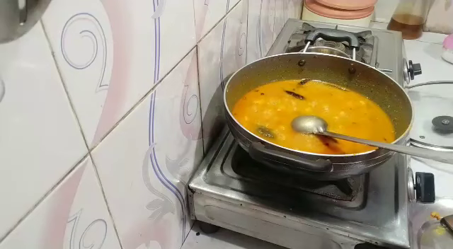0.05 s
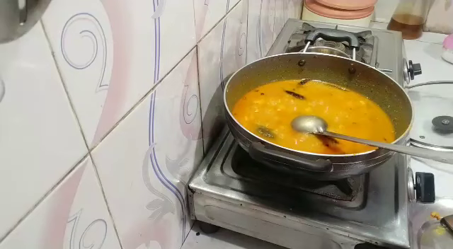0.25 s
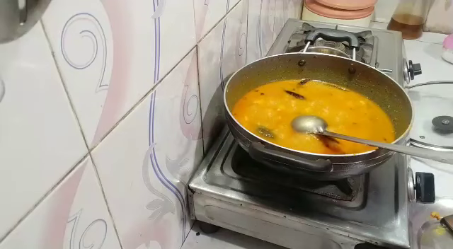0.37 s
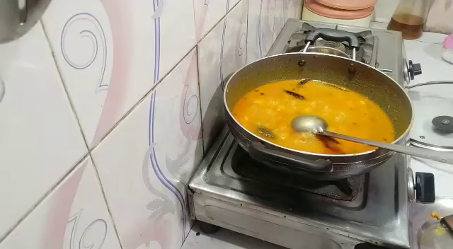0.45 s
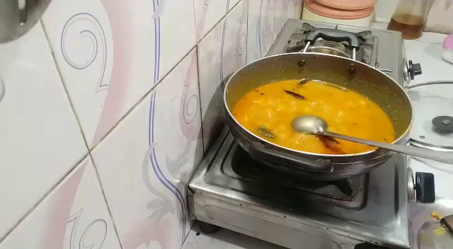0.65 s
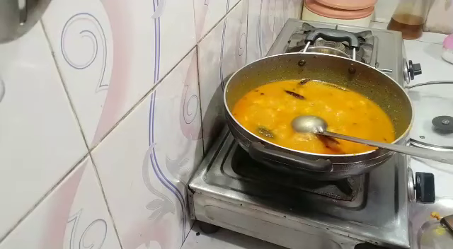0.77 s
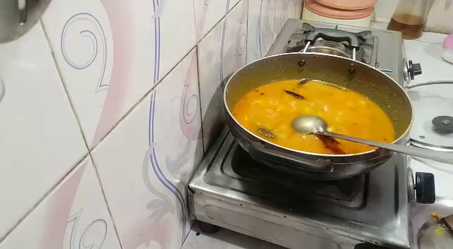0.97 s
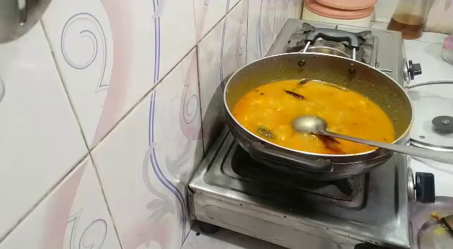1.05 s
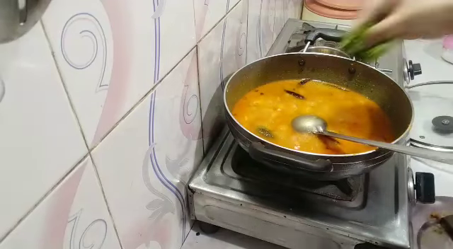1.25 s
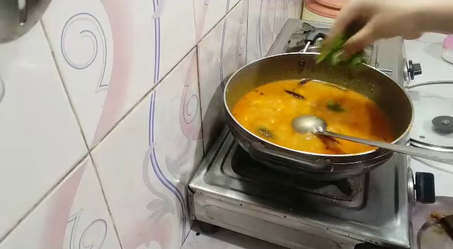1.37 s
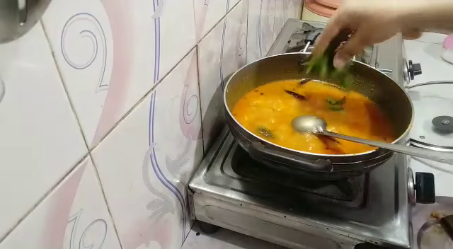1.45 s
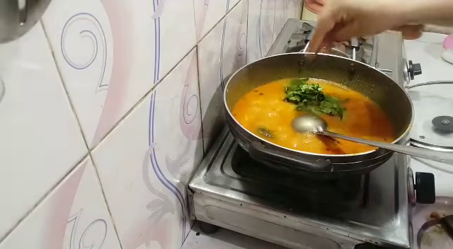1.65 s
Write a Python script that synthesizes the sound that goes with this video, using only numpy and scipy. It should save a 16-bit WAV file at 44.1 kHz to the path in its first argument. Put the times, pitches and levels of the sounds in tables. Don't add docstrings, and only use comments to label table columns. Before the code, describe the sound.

Thick curry simmers with low bubbling pops and fine spatter, interrupted by one sharp metallic clank.

```python
import sys
import numpy as np
from scipy import signal
from scipy.io import wavfile
from scipy.ndimage import uniform_filter1d

SR = 44100
rng = np.random.default_rng(int(sys.argv[2]) if len(sys.argv) > 2 else 0)


def linear_from_db(decibels):
    return 10 ** (np.asarray(decibels, float) / 20)


def store_pcm(level_fs):
    pcm = np.round(np.clip(level_fs, -1, 1) * 32767).astype(np.int16)
    wavfile.write(sys.argv[1], SR, np.atleast_2d(pcm).T)


N = 74970

LAND_S = .2365
POP_TURNS, POP_RISE = 4.97, 0.045


def evened(x):
    return x / np.sqrt(np.mean(x ** 2) + 1e-20)


def read(points, hz):
    f, value = np.transpose(points)
    return np.interp(np.log(hz + 1), np.log(f + 1), value)


def add(mix, s, sound):
    part = mix[:, round(s * SR):][:, :sound.shape[1]]
    part += sound[:, :part.shape[1]]


def hiss(shape, patchy_db, flicker_db):
    # frequency_hz, likeness (0-1)
    likeness = [(30, .2), (150, 0.77), (600, 0.74), (1500, 0.038), (15000, 0.1)]
    most_db = 3.5
    frames, hz = N // 128 + 5, np.fft.rfftfreq(512, 1 / SR)
    a, b, c, d, p = rng.standard_normal((frames, 257, 5)).T
    patches = evened(uniform_filter1d(uniform_filter1d(p, 8, 0), 12, 1))
    flicker = evened(uniform_filter1d(rng.standard_normal(frames), 3))
    same = np.clip(read(likeness, hz), -1, 1)[:, None]
    left = a + 1j * b
    right = same * left + np.sqrt(1 - same ** 2) * (c + 1j * d)
    level_db = read(shape, hz)[:, None] + min(patchy_db, most_db) * patches
    level_db = level_db + min(flicker_db, most_db) * flicker
    z = np.array([left, right]) * linear_from_db(level_db)
    return evened(signal.istft(z, nperseg=512, noverlap=384)[1][:, :N])


def blip(hz, turns, rise):
    u = np.arange(0, 3.3 * turns / hz, 1 / SR) * hz / turns
    swell = (3 * u * np.exp(1 - 3 * u)) ** 2
    return swell * np.sin(2 * np.pi * turns * u * (1 + rise * u))


def kitchen(x):
    # frequency_hz, t60_s
    decay = [(150, 0.85), (700, 0.36), (2000, 0.48), (6000, 0.46), (12000, 0.06)]
    taps = np.zeros((2, SR))
    at = np.arange(300, SR - 20, 20)[:, None] + rng.integers(0, 20, ((SR - 301) // 20, 2))
    np.put_along_axis(taps, at.T, rng.choice([-1., 1.], at.T.shape), 1)
    hz, t, z = signal.stft(taps, SR, nperseg=256)
    tail = signal.istft(z * linear_from_db(-60 * t / read(decay, hz)[:, None]), SR, nperseg=256)[1]
    return signal.fftconvolve(x, tail / np.linalg.norm(tail[0]), axes=1)[:, :N]


def rustles():
    # start_s, length_s, level_db, airy_share (0-1)
    strokes = [
        (0, 0.17, -67.5, 0.51),
        (0.16, 0.064, -65.5, 0.84),
        (0.604, 0.048, -66, 0.65),
        (0.617, 0.26, -81, 0.93),
        (0.714, 0.17, -71.5, 1),
        (0.874, 0.084, -68.5, 0.39),
        (.97, 0.18, -74, 0.5),
        (1.318, 0.043, -79, 0.34),
        (1.388, 0.14, -71.5, 0.97),
        (1.6, 0.18, -60, 0.16),
    ]
    # frequency_hz, level_db per Hz
    leaf_shape = [(700, -21), (1500, -9), (3500, -15), (5300, -13), (9000, -21), (16000, -23)]
    # frequency_hz, level_db per Hz
    air_shape = [(4000, -26), (8000, -9.5), (12500, -17.5), (15000, -16)]
    t, out = np.arange(N) / SR, 0
    leaf, air = hiss(leaf_shape, 9, 3.9), hiss(air_shape, 4, 6.6)
    for s, length, db, top in strokes:
        rise = np.clip((t - s) / 0.017, 0, 1)
        fall = np.clip((s + length - t) / (0.73 * length), 0, 1)
        out = out + linear_from_db(db) * rise * fall * ((1 - top) * leaf + top * air)
    return out


def muffled(x):
    return signal.sosfiltfilt(signal.butter(8, 1060, fs=SR, output="sos"), x)


def small_bubbles():
    per_s, sizes = 130, 10
    out = np.zeros((2, N))
    for hz in np.geomspace(420, 950, num=sizes):
        draw = rng.random((N, 2))
        train = (draw[:, 0] < per_s / sizes / SR) * linear_from_db(6.7 * draw[:, 1])
        out += signal.oaconvolve(train, blip(hz, POP_TURNS, POP_RISE))[:N]
    return evened(out + kitchen(out))


def simmer():
    # time_s, level_db
    opening = [(0, -63.5), (.2, -66), (.3, -55), (.55, -61), (.85, -67.5), (1.08, -75), (1.24, -89),
               (1.29, -86.5), (1.53, -91.5), (1.62, -70.5), (1.7, -60)]
    # frequency_hz, level_db per Hz
    gurgle_shape = [(25, -14.5), (110, -26.5), (300, 1.5), (500, -10.5), (750, -4), (980, -1),
                    (1100, -25.5), (3500, -55.5)]
    # frequency_hz, level_db per Hz
    fizz_shape = [(1500, -28.5), (3000, -25.5), (4400, -16), (5600, -4), (6500, -17), (10000, -25.5),
                  (16000, -57)]
    # frequency_hz, level_db per Hz
    draught_shape = [(600, -32.5), (1200, 13.5), (3500, 11.5), (6000, 3.5), (9000, -41.5)]
    hum_shape = [(20, -20), (190, 9), (900, -23.5), (4000, -39), (16000, -11)]
    t = np.arange(N) / SR
    open_db = np.interp(t, *np.transpose(opening))
    sauce = 0.63 * hiss(gurgle_shape, 1.7, 1.8) + .5 * muffled(small_bubbles())
    gurgle = linear_from_db(open_db) * sauce * linear_from_db([[-2], [2]])
    fizz = linear_from_db(-65.5 + 0.4 * (open_db + 61.5)) * hiss(fizz_shape, 7.7, 5.8)
    opening_db = -9 * np.maximum(1 - (t - LAND_S) / .3, 0)
    shutting_db = -143 * np.maximum(t - 0.794, 0)
    draught_db = np.where(t < LAND_S, -11, opening_db + shutting_db)
    draught = linear_from_db(-65.5 + draught_db) * hiss(draught_shape, 0.83, 0.76)
    hum = linear_from_db(-86) * hiss(hum_shape, 1.5, 2.3)
    return gurgle + fizz + draught + hum


def pops():
    # start_s, peak_db, pitch_hz
    bubbles = [(0.021, -54, 687), (0.113, -50.5, 740), (0.15, -43.5, 857), (0.436, -39, 1008),
               (.47, -49.5, 567), (.498, -50, 656), (0.515, -52.5, 592), (.354, -58, 507),
               (.829, -57.5, 575), (.914, -53, 690), (.979, -65, 717), (1.148, -69.5, 661),
               (1.535, -73.5, 780), (1.683, -70, 606), (0.553, -40, 768), (0.663, -47, 590),
               (0.717, -48.5, 784), (0.791, -49, 874), (0.877, -46.5, 749), (0.999, -59, 544),
               (1.042, -51.5, 806), (1.072, -50, 724), (1.173, -59, 593), (1.21, -62.5, 699),
               (1.55, -54.5, 727), (1.581, -55.5, 787), (1.623, -40, 747), (1.664, -64, 780)]
    echo_s, echo_db, pan_db = 0.00694, -7, -5
    out, pan = np.zeros((2, N)), linear_from_db(np.array([[.5], [-.5]]) * pan_db)
    for s, db, hz in bubbles:
        pop = pan * linear_from_db(db) * blip(hz, POP_TURNS, POP_RISE)
        add(out, s, pop)
        add(out, s + echo_s, linear_from_db(echo_db) * pop)
    return out


def ticks():
    # start_s, peak_db, pitch_hz
    droplets = [(0.0611, -44.5, 5540), (0.096, -45, 5390), (0.1812, -55, 6100), (0.222, -52, 5760),
                (0.427, -43, 6200), (.534, -45.5, 5330), (0.5729, -46.5, 5480), (.5819, -57, 3800),
                (0.602, -42, 5680), (0.6352, -58, 5500), (0.7361, -53, 5300), (0.7646, -45.5, 5700),
                (0.8062, -56, 2920), (0.879, -54.5, 5680), (0.9077, -63, 5230), (0.9175, -55.5, 3660),
                (0.9531, -55.5, 6100), (0.9626, -50.5, 6030), (0.97, -59.5, 4970), (0.9933, -53.5, 6500),
                (1.0287, -81, 5700), (1.0383, -58, 5870), (1.0425, -60, 3440), (1.059, -51, 5650),
                (1.071, -49.5, 5470), (1.1262, -55.5, 5800), (1.1504, -57.5, 5440), (1.1666, -48.5, 5570),
                (1.185, -62, 6700), (1.209, -58, 3580), (1.286, -65.5, 4200), (1.311, -51, 5450),
                (1.3549, -50.5, 5670), (1.3615, -53, 5610), (1.41, -61.5, 5240), (1.434, -49.5, 5160),
                (1.4787, -66.5, 5710), (1.4929, -56.5, 5730), (1.5239, -52, 6030), (1.5637, -64, 5840),
                (1.5826, -61, 4970), (1.588, -60, 2830), (1.611, -52, 5140), (1.635, -49, 5900),
                (1.6555, -53.5, 5570), (1.6964, -47, 4870)]
    turns, tail_t60_s, tail_db = 11, 0.08, -13
    out, t = np.zeros((2, N)), np.arange(4000) / SR
    for s, db, hz in droplets:
        band = signal.butter(4, np.array([.82, 1.18]) * hz, "band", fs=SR, output="sos")
        fizz = signal.sosfilt(band, rng.standard_normal((4000, 2)).T)
        add(out, s, linear_from_db(db + tail_db - 60 * t / tail_t60_s) * evened(fizz))
        lag = rng.uniform(0, 3 / SR)
        snap = linear_from_db(db) * blip(hz, turns, 0)[None]
        add(out[:1], s, snap)
        add(out[1:], s + lag, snap)
    return out


def ring(modes, t, spread):
    hz, db, t60 = np.transpose(modes)[:, :, None]
    start, side = rng.random((len(modes), 2, 1)).transpose(1, 0, 2)
    tone = linear_from_db(db - 60 * t / t60) * np.exp(2j * np.pi * (hz * t + start))
    turned = tone * np.exp(1j * spread * np.sign(side - .5))
    return np.array([tone.imag.sum(0), turned.imag.sum(0)])


def vessel():
    # pitch_hz, level_db, t60_s
    base_modes = [(154, -16, .25), (197, -12, .33), (350.4, -11, .1), (430, -11, .4), (470, 5, .18),
                  (508, -2, .13), (598, -15, .45)]
    # pitch_hz, level_db, t60_s
    belly_modes = [(1335, -14, .48), (1626, -7, .8), (2164, -15, .8), (2303, 0, .67), (2369, -4, .29),
                   (2676, -12, .4), (2794, -11, 1.1), (2885, -9, .41), (3112, -11, 1.1), (3268, -7, .5),
                   (3521, -9, 1.1), (3763, -11, .6), (4021, -3, .25), (4323, -1, .24)]
    # pitch_hz, level_db, t60_s
    wall_modes = [(4468, -16, .6), (4667, -14, .4), (4797, -2, .18), (5190, -10, .35), (5237, -4, .15),
                  (5297, -13, .3), (5368, -8, 1.2), (5437, -14, .64), (5644, -10, .7), (5846, -11, .28),
                  (6120, -11, .58), (6428, -6, .2), (6589, -9, .18), (6665, -2, .12)]
    # pitch_hz, level_db, t60_s
    rim_modes = [(7224, -4, .18), (7656, -5, .25), (8807, -6, .23), (9033, -4, .16), (9491, -11, .3),
                 (10300, -7, .18), (10510, -6, .17), (11250, -9, .2), (11590, -9, .35), (12770, 0, .1),
                 (13160, -2, .13), (13900, -10, .3), (14150, 0, .09), (14760, -11, .21)]
    # frequency_hz, level_db per Hz
    crowd_shape = [(90, -54), (300, -4.5), (900, -22.5), (1600, -12.5), (3200, -18.5), (5300, 2.5),
                   (8000, -14), (14000, -20.5), (15800, -18.5)]
    # frequency_hz, t60_s
    crowd_t60 = [(2000, 0.17), (6000, .17), (15000, 0.09)]
    # after_landing_s, level_db
    contacts = [
        (0, 1),
        (.0045, 1.5),
        (.0125, -3.5),
        (.022, -8.5),
        (.042, -10),
    ]
    t = np.arange(30000) / SR
    pick = rng.random((300, 3))
    hz = 250 + 15500 * pick[:, 0]
    crowd_db = read(crowd_shape, hz) + 14 * pick[:, 1]
    crowd = np.c_[hz, crowd_db, read(crowd_t60, hz) * (.4 + 1.1 * pick[:, 2])]
    tones = linear_from_db(-32.5) * ring(wall_modes, t, 1.15)
    tones += linear_from_db(-45) * ring(belly_modes, t, 2.0)
    tones += linear_from_db(-40) * ring(rim_modes, t, 0.81)
    wall = linear_from_db(-70 * np.maximum(t - .24, 0)) * tones
    crack = linear_from_db(-28 - 60 * t / .08) * hiss(crowd_shape, 9, 7.5)[:, :30000]
    crack[:, :12000] += linear_from_db(-50.5) * ring(crowd, t[:12000], 1.63)
    base = linear_from_db(-28) * ring(base_modes, t, .7) * linear_from_db([[-2], [2]])
    out = np.zeros((2, N))
    add(out, LAND_S, np.minimum(t / 0.0097, 1) * base + np.minimum(t / .016, 1) * wall)
    for s, db in contacts:
        add(out, LAND_S + s, linear_from_db(db) * np.minimum(t / 0.0014, 1) * crack)
    return out


def glugs():
    # start_s, peak_db, pitch_hz
    large = [
        (0.262, -67.5, 94.2),
        (.435, -62.5, 187),
        (0.602, -60, 446),
        (0.761, -60.5, 197.6),
        (.995, -71.5, 296.5),
        (1.615, -65.5, 257),
        (1.681, -66, 114),
    ]
    out = np.zeros((2, N))
    for s, db, hz in large:
        add(out, s, linear_from_db(db) * blip(hz, 12.0, 0.006) * linear_from_db([[-1.5], [1.5]]))
    return out


def scene():
    low, high, steel = muffled(pops()), ticks(), vessel()
    room = kitchen(linear_from_db(-6.5) * low + linear_from_db(-8.5) * high + linear_from_db(-19) * steel)
    return rustles() + simmer() + low + high + steel + glugs() + room


def top_cut(x):
    return signal.sosfilt(signal.butter(12, 16370, fs=SR, output="sos"), x)


def record(dry):
    # frequency_hz, level_db per bin
    threshold = [(1600, -122), (3000, -117), (9000, -104)]
    gate_low_hz, depth_db, knee_db = 1600, -17, 7
    mask_db = -9
    t = np.arange(N) / SR
    dip = 1 - 1.9 * np.clip(1 - abs(t - .2315) / 0.0017, 0, 1)
    hz, _, z = signal.stft(dry * dip, SR, nperseg=1024)
    power = uniform_filter1d((abs(z) ** 2).mean(0), size=3, axis=0)
    power = abs(uniform_filter1d(power, size=4, axis=1)) + 1e-20
    near_db = 10 * np.log10(abs(uniform_filter1d(power, size=61, axis=0)) + 1e-20) + mask_db
    sill_db = np.maximum(read(threshold, hz)[:, None], near_db)
    weak = np.clip((sill_db - 10 * np.log10(power)) / knee_db, 0, 1) * (hz > gate_low_hz)[:, None]
    gated = signal.istft(z * linear_from_db(depth_db * weak), nperseg=1024)[1][:, :N]
    cut = signal.oaconvolve(gated, signal.firwin(255, 15900, fs=SR)[None], "same")
    return top_cut(cut)


dry = scene()
out = record(dry)
store_pcm(out)
```